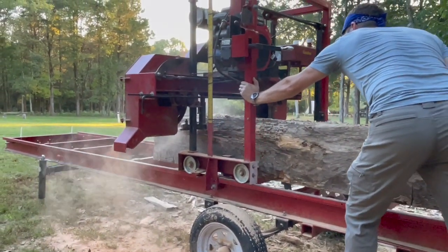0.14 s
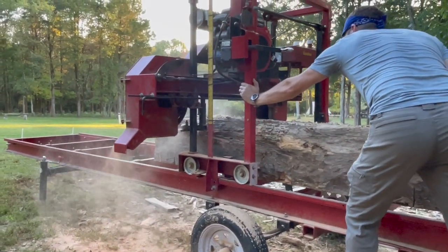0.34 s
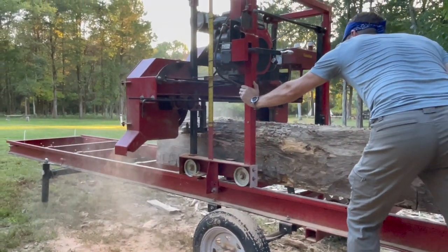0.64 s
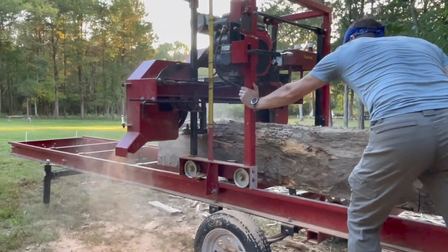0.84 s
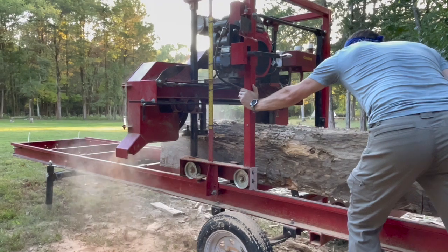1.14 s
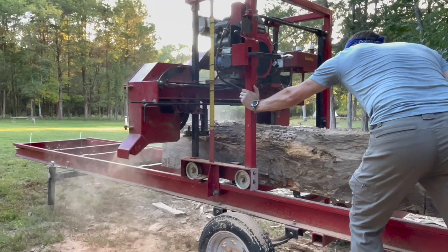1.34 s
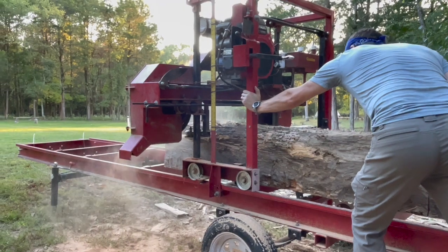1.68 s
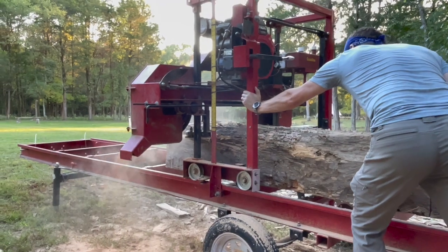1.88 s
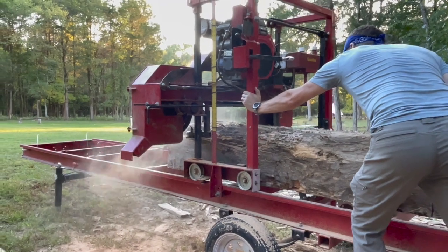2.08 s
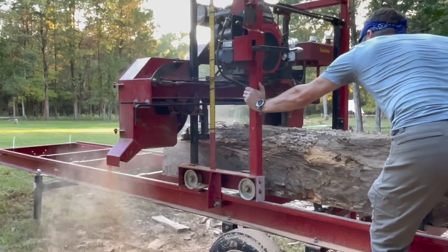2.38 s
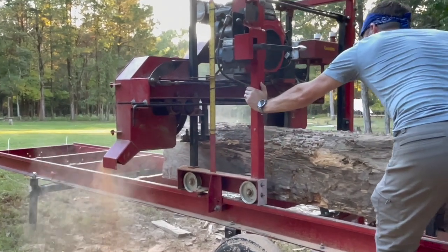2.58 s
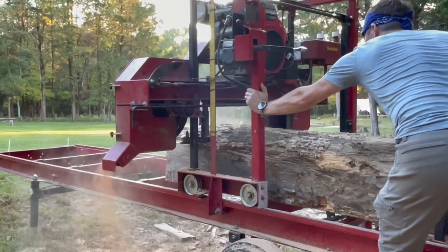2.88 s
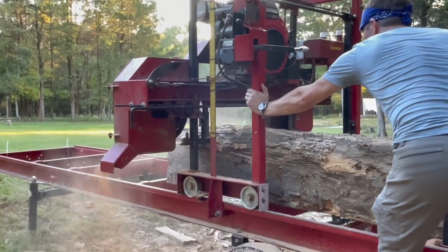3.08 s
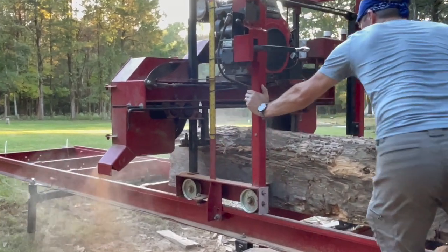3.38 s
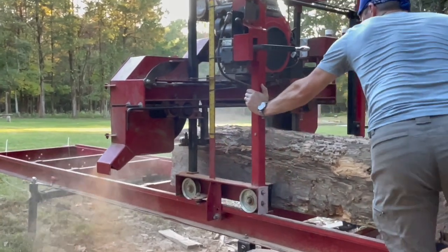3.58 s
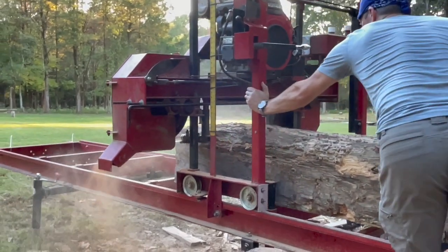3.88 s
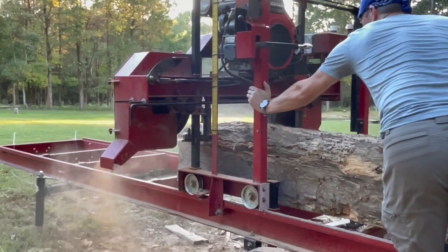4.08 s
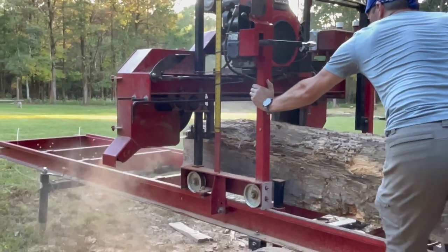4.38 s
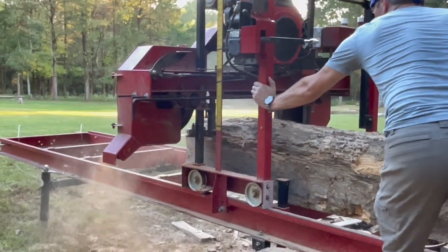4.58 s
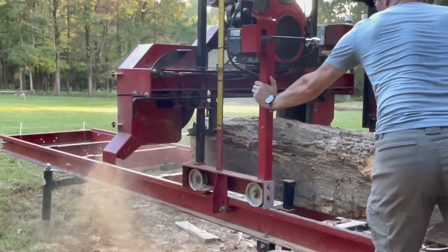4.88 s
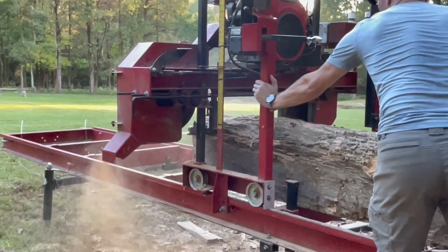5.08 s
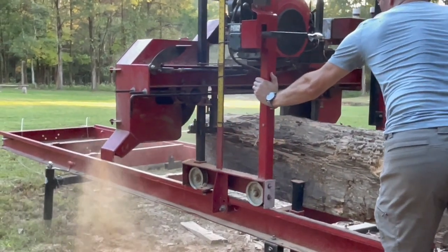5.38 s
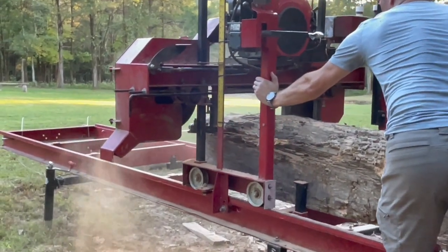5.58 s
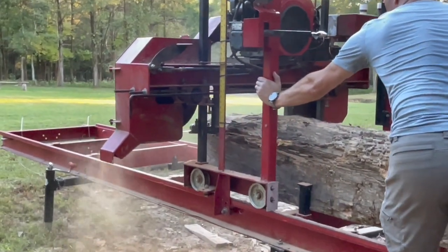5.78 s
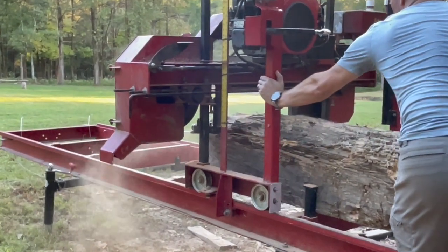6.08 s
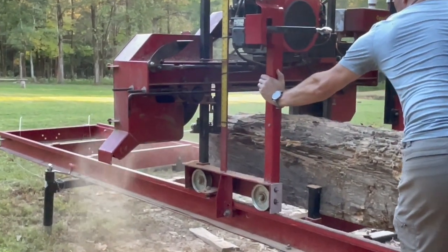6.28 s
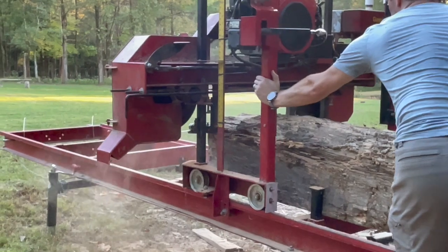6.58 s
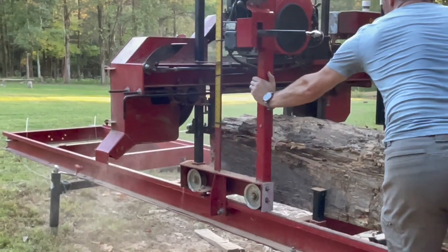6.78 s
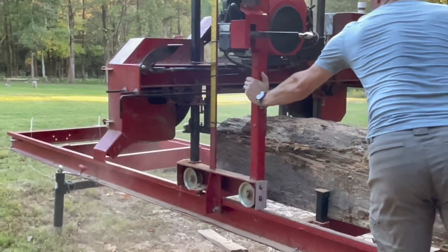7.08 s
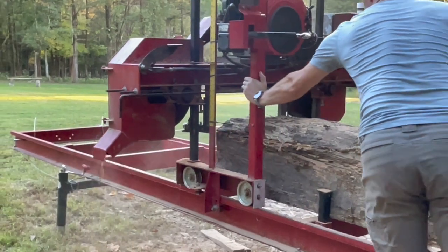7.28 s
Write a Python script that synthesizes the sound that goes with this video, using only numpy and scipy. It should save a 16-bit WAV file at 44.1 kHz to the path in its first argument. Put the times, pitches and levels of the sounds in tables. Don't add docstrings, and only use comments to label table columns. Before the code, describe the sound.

A sawmill is already cutting at full tilt when the sound begins. Lumpy exhaust pulses ring low and hollow beneath a dense roar, with gritty rasping teeth and a sharp, wide sizzle above. Engine speed wavers gently, and thin metallic singing flickers within the noise. Near the end the rasp lightens while the engine lifts a little. Dry, close outdoor phone pickup, with slightly ragged, phasey treble.

```python
import sys
import numpy as np
from scipy import signal
from scipy.io import wavfile
from scipy.ndimage import uniform_filter1d

SR = 44100
rng = np.random.default_rng(int(sys.argv[2]) if len(sys.argv) > 2 else 0)


def voltage_ratio(level):
    return 10 ** (np.asarray(level, float) / 20)


def dump_mix(stems):
    frames = np.atleast_2d(stems).T
    limited = np.clip(frames, -1, 1)
    pcm = np.round(limited * 32767).astype(np.int16)
    wavfile.write(sys.argv[1], SR, pcm)


N = 328545
SIZE, HOP = 1024, 256

# time_s, cycles_per_s
ENGINE_SPEED = [(0.0, 25.7), (0.41, 26.7), (0.7, 26.2), (1.1, 25.2), (1.56, 27.2), (2.3, 25.3),
                (2.92, 26.4), (3.4, 25.7), (3.69, 26.0), (4.21, 27.1), (4.88, 25.8), (5.29, 26.0),
                (5.6, 25.5), (5.93, 27.0), (6.14, 27.1), (6.49, 27.9), (7.14, 27.1), (7.45, 27.5)]
# time_s, level_db
CRANK_THUMP = [(0.05, -34.5), (0.93, -36), (1.34, -33.5), (1.85, -36.5), (2.63, -35), (3.24, -35),
               (4.08, -35), (4.51, -37.5), (5.82, -35.5), (6.17, -37), (7.38, -38), (7.4, -37.5)]
# time_s, level_db
BLADE_BITE = [(0, -28.5), (.45, -29), (1, -29.5), (1.4, -29), (2.2, -28.5), (2.6, -28.5), (3.1, -29),
              (3.55, -29), (3.85, -28.5), (4.55, -29), (4.85, -29.5), (5.1, -30), (5.55, -28.5),
              (5.85, -28.5), (6.14, -28), (6.3, -31), (6.5, -32), (7.45, -31.5)]
# pitch_hz, level_db
EXHAUST_PIPE = [(120, -42.5), (185, -9), (210, -13.5), (240, -8.5), (265, 4), (290, 6.5), (315, -2),
                (340, -3), (370, -6), (420, 2), (470, -10.5), (520, -21), (700, -16), (1200, -51)]
# delay_ms, level_db
SILENCER_ECHOES = [
    (6, -5),
    (15, -6),
]
# times_per_cycle, level_db, phase_rad
BLOCK_SHAKE = [
    (3, 0, 1.14),
    (4, -9, 2.9),
    (5, -7.5, 3.77),
    (6, -6, 1.1),
]

# pitch_hz, level_db
ROAR_COLOUR = [(30, -20), (60, 3), (120, -14), (200, -3), (330, 1.5), (450, 2.5), (560, -2.5), (800, 1),
               (1000, -1), (1200, -1), (1750, -5.5), (2300, -13), (3500, -12)]
# pitch_hz, level_db
RASP_COLOUR = [(900, -28), (1700, 2.5), (2300, 1.5), (3000, 1), (4000, 0), (4900, 2), (5500, -2.5),
               (6000, 0.5), (6800, 1.5), (7600, 2), (9000, -29)]
# pitch_hz, level_db
SIZZLE_COLOUR = [(5500, -26), (7000, -9.5), (7500, -3), (7850, 4), (8200, 1), (9000, 3), (10000, -2),
                 (10600, -2.5), (11300, -5), (12500, -18)]
# pitch_hz, level_db
HISS_COLOUR = [(9500, -41), (11300, -3), (12300, 3), (12800, 2), (13500, 5), (14100, 1.5), (15200, -2.5),
               (16200, -5.5)]
# level_db at the usual bite, bite_share followed, change_db_per_s as the head rolls away
NOISE_LEVELS = [
    (-29, 0.24, -0.17),
    (-33.5, 1.7, 0.19),
    (-27, 1, -.05),
    (-28.5, 0.9, -0.08),
]
# start_s, length_s, level_db
TOOTH_SONGS = [
    [(.1, 0.5, -69), (.85, .22, -58), (2.15, 0.18, -57), (2.62, 0.98, -48.5), (3.5, 0.33, -40.5),
     (4.55, 0.41, -48), (5.2, 1, -52)],
    [(.5, .42, -49), (1.5, .8, -61), (2.6, 0.61, -53), (3.25, 0.85, -48), (3.95, 0.75, -50),
     (4.55, .55, -47), (5.15, 0.65, -50)],
    [(.55, 0.88, -46), (1.7, .33, -45), (3.1, .7, -54), (4.05, 1.1, -48), (5.3, .25, -47), (5.65, .55, -54)],
    [(.65, 0.49, -46), (1.55, .8, -61), (2.6, .55, -56), (3.05, 0.68, -48), (5.65, .55, -54)],
]
# start_s, length_s, pitch_hz, level_db
BLADE_SQUEALS = [(1.91, .055, 3790, -38), (1.945, .015, 1720, -36), (6.04, .1, 4950, -43),
                 (5.85, .34, 3360, -44), (3.52, .2, 5800, -45), (2.2, .28, 4860, -46), (2.7, .5, 6260, -47),
                 (3.55, .5, 1740, -47), (5.9, .4, 2640, -48), (5.4, .2, 4100, -50), (5.4, .25, 3370, -50),
                 (2.35, .55, 810, -44), (3.6, .3, 820, -43), (4.0, .5, 1760, -47)]

# pitch_hz, early_phase_rad, early_likeness (0-1), late_phase_rad, late_likeness (0-1),
# left_over_right_db
MIC_PORTS = [(170.0, -0.1, 0.97, -0.1, 0.97, 0.2), (340.0, -0.2, 0.96, -0.2, 0.96, 0.8),
             (860.0, -0.5, 0.78, -0.2, 0.88, 0.9), (1400.0, -0.2, 0.65, -0.1, 0.9, 2.6),
             (2400.0, -0.3, 0.62, -0.3, 0.7, 0.9), (3400.0, -0.7, 0.56, -0.7, 0.56, 0.6),
             (4800.0, -1.8, 0.59, 0.5, 0.6, -0.9), (5500.0, -3.1, 0.17, 0.5, 0.71, 1.6),
             (6900.0, 1.7, 0.31, 0.8, 0.83, 0.3), (7600.0, 3.0, 0.82, 2.3, 0.9, 1.0),
             (8800.0, 3.1, 1.0, 3.1, 1.0, -0.0), (10300.0, 4.0, 0.64, 4.2, 0.76, -0.4),
             (11200.0, 5.7, 0.58, 5.0, 0.61, 0.1), (12400.0, 6.3, 1.0, 6.2, 0.98, -0.0)]
# time_s, mono_low_hz, mono_high_hz, difference_top_hz, sum_gap_top_hz
STEREO_EDGES = [
    (0, 3000, 3000, 11350, 9750),
    (2.25, 3000, 3000, 11350, 9800),
    (2.63, 1400, 6890, 11350, 9700),
    (3.8, 1250, 6890, 11300, 9650),
    (4, 1250, 6890, 10650, 9450),
    (5.03, 1250, 6890, 10650, 9450),
    (5.06, 1200, 5400, 10650, 9100),
    (5.36, 1200, 5350, 11250, 9000),
    (7.45, 1150, 5350, 11250, 9100),
]
# time_s, limit_db
FAINTEST_TREBLE = [
    (0, -4.5),
    (2.2, -5),
    (3.6, -8.5),
    (7.45, -13),
]


def evened(x):
    return x / np.sqrt(np.mean(abs(x) ** 2) + 1e-20)


def read(points, hz):
    f, *columns = np.transpose(points)
    return np.squeeze([np.interp(np.log(hz + 1), np.log(f + 1), c) for c in columns])


def follow(rows, t):
    s, *columns = np.transpose(rows)
    return [np.interp(t, s, c) for c in columns]


def drift(per_s, count=N, step=1):
    width = max(int(SR / step / per_s / 2), 1)
    noise = uniform_filter1d(rng.standard_normal(count), width)
    return evened(uniform_filter1d(noise, width))


def causal(points):
    log_gain = np.log(voltage_ratio(read(points, np.fft.rfftfreq(16384, 1 / SR))))
    circle = np.r_[log_gain, log_gain[-2:0:-1]]
    return np.fft.ifft(np.exp(np.conj(signal.hilbert(circle)))).real[:6000]


def running():
    t = np.arange(N) / SR
    curves = follow(ENGINE_SPEED, t) + follow(CRANK_THUMP, t)
    return uniform_filter1d(curves, int(0.15 * SR), axis=1)


def bite(t):
    return follow(BLADE_BITE, t)[0] + 29


def exhaust(cycles):
    firings = np.zeros(N)
    second_place = 0.625 + 0.006 * drift(2)
    for place, db in ((0, 0), (second_place, 1)):
        at = np.flatnonzero(np.diff(np.floor(cycles - place)))
        late_s = 0.00006 * rng.standard_normal(len(at))
        size_db = 0.8 * rng.standard_normal(len(at))
        firings[np.clip(at + (late_s * SR).astype(int), 0, N - 1)] = voltage_ratio(db + size_db)
    echoes = sum(voltage_ratio(db) * np.roll(firings, int(ms * SR / 1000)) for ms, db in SILENCER_ECHOES)
    return evened(signal.oaconvolve(firings + echoes, causal(EXHAUST_PIPE))[:N])


def block_shake(cycles, block_db):
    shake = 0
    for order, db, phase in BLOCK_SHAKE:
        size = voltage_ratio(block_db + db + 0.077 * drift(5.6))
        shake = shake + size * np.sin(2 * np.pi * round(order) * cycles + phase)
    return shake


def engine():
    per_s, crank_db = running()
    load_db = bite(np.arange(N) / SR)
    cycles = np.cumsum(per_s) / SR
    exhaust_db = crank_db - 1 + 0.27 * load_db + 0.67 * drift(10)
    block_db = crank_db - 4 + 0.6 * (per_s - 26.3) + 0.96 * np.minimum(load_db, 0)
    crank = voltage_ratio(crank_db) * np.sin(2 * np.pi * 2 * cycles + 1.2)
    shaking = np.sqrt(2) * (crank + block_shake(cycles, block_db))
    return voltage_ratio(exhaust_db) * exhaust(cycles) + shaking


def steel_bed_echo(hz):
    strength = 0.16 / (1 + (hz / 2190) ** 2)
    return abs(1 - strength * np.exp(-2j * np.pi * hz * 2.08 / 1000))


def grain_and_ringing(hz, t):
    def smooth_noise(time_width, pitch_width):
        noise = uniform_filter1d(rng.standard_normal((len(t), len(hz))), time_width, axis=0)
        return evened(uniform_filter1d(noise, pitch_width, axis=1).T)

    patches = smooth_noise(14, 9)
    streaks = smooth_noise(22, 2)
    blade_range = ((hz > 1500) & (hz < 9000))[:, None]
    ringing_db = 0.74 * np.maximum(streaks, 0) ** 2 * blade_range
    return np.minimum(ringing_db, 9) - 0.74 + 0.5 * patches


def noise_field(hz, t):
    def slow(per_s):
        return drift(per_s, count=len(t), step=HOP)

    colours = (ROAR_COLOUR, RASP_COLOUR, SIZZLE_COLOUR, HISS_COLOUR)
    surges_db, flickers_db = (0.67, 0.38, 0.18, 0.3), (0.3, 0.73, 1.15, 0.75)
    echo = steel_bed_echo(hz)
    power = 0
    for shape, (db, share, db_per_s), surge_db, flicker_db in zip(colours, NOISE_LEVELS, surges_db, flickers_db):
        level_db = db + share * bite(t) + db_per_s * t
        level_db = level_db + surge_db * slow(4) + flicker_db * slow(18)
        colour = voltage_ratio(read(shape, hz)) * echo
        colour /= np.linalg.norm(colour)
        power = power + np.outer(colour, voltage_ratio(level_db)) ** 2
    return np.sqrt(power) * voltage_ratio(grain_and_ringing(hz, t) + 0.31 * slow(30))


def swell(t, s, length):
    return np.sin(np.pi * np.clip((t - s) / length, 0, 1)) ** 0.6


def teeth():
    t = np.arange(N) / SR
    per_s = uniform_filter1d(running()[0], SR // 8)
    teeth_per_cycle = 48
    turns = np.cumsum(teeth_per_cycle * per_s * (1 + 0.0008 * drift(30))) / SR
    out = np.zeros(N)
    for overtone, songs in enumerate(TOOTH_SONGS, 1):
        size = sum(voltage_ratio(db) * swell(t, s, length) for s, length, db in songs)
        boost_db = 0 if overtone == 3 else 4
        out += size * voltage_ratio(boost_db + 2.5 * drift(20)) * np.sin(2 * np.pi * overtone * turns)
    return out


def squeals():
    t = np.arange(N) / SR
    out = np.zeros(N)
    for s, length, hz, db in BLADE_SQUEALS:
        size = swell(t, s, length) * voltage_ratio(db + 3 * drift(30))
        turns = hz * np.cumsum(1 + 0.002 * drift(25)) / SR
        out += np.sqrt(2) * size * np.sin(2 * np.pi * turns)
    return out


def port_link(hz, t):
    phase0, same0, phase1, same1, lean_db = read(MIC_PORTS, hz)[:, :, None]
    moved = np.interp(t, (2.2, 3.0), (0, 1))
    early = np.clip(same0, 0, 1) * np.exp(1j * phase0)
    late = np.clip(same1, 0, 1) * np.exp(1j * phase1)
    return (1 - moved) * early + moved * late, lean_db


def scene():
    hz, t, tones = signal.stft(engine() + teeth() + squeals(), SR, nperseg=SIZE, noverlap=SIZE - HOP)
    a, b, c, d = rng.standard_normal((len(t), len(hz), 4)).T
    field = noise_field(hz, t) * 1.2
    link, lean_db = port_link(hz, t)
    left = field * (a + 1j * b)
    unlike = np.sqrt(np.maximum(1 - abs(link) ** 2, 0)) * field * (c + 1j * d)
    right = link * left + unlike
    pair = np.array([left + tones, right + tones * np.exp(1j * np.angle(link))])
    pair *= voltage_ratio(np.array([lean_db, -lean_db]) / 2)
    return signal.istft(pair, SR, nperseg=SIZE, noverlap=SIZE - HOP)[1][:, :N]


def masked(z, hz, limit):
    local_power = uniform_filter1d(abs(z) ** 2, size=7, axis=0)
    return z * ((local_power > limit) | (hz < 2000))


def snapped(edge_hz):
    width_hz = SR / 128
    return np.round(edge_hz / width_hz) * width_hz


def low_pass(x):
    return signal.sosfilt(signal.butter(12, 16980, fs=SR, output="sos"), x)


def record(dry):
    pair = np.array([dry[0] + dry[1], dry[0] - dry[1]]) / 2
    hz, t, (mid, side) = signal.stft(pair, SR, nperseg=2048)
    f = hz[:, None]
    low_hz, high_hz, top_hz, gap_top_hz = follow(STEREO_EDGES, t)
    spread_hz = np.array([[150], [90], [420], [330]])
    ragged = uniform_filter1d(rng.standard_normal((len(t), 4)), 2, axis=0).T * spread_hz

    above_low = f > low_hz + ragged[0]
    below_high = f < snapped(high_hz + ragged[1])
    folded = above_low & below_high & (low_hz < high_hz)
    below_top = f < snapped(top_hz - 250 + ragged[2] ** 2 / 250)
    side = side * ~folded * below_top * np.clip(f / 140, 0, 1) ** 2

    gap_low_hz = 8270
    unfolded = np.min(abs(t[:, None] - np.array((3.41, 4.45))), axis=1) < 0.0125
    random_phase = np.exp(2j * np.pi * rng.random(mid.shape))
    mid = mid + 0.6 * side * unfolded * (f > gap_low_hz) * random_phase
    above_gap = f > snapped(gap_top_hz + 120 + ragged[3])
    mid = mid * ((f < gap_low_hz) | above_gap | unfolded) * (f < 15750)

    typical = np.median(abs(mid[(hz > 2000) & (hz < 7000)]) ** 2)
    limit = typical * voltage_ratio(follow(FAINTEST_TREBLE, t)[0]) ** 2
    mid = masked(mid, f, limit)
    side = masked(side, f, limit * voltage_ratio(-7))
    left_right = signal.istft(np.array([mid + side, mid - side]), SR, nperseg=2048)[1][:, :N]
    return low_pass(left_right)


dry = scene()
out = record(dry)
dump_mix(out)
```